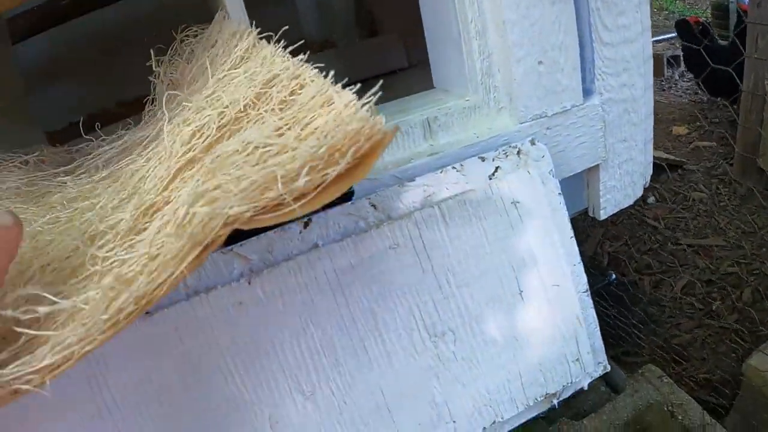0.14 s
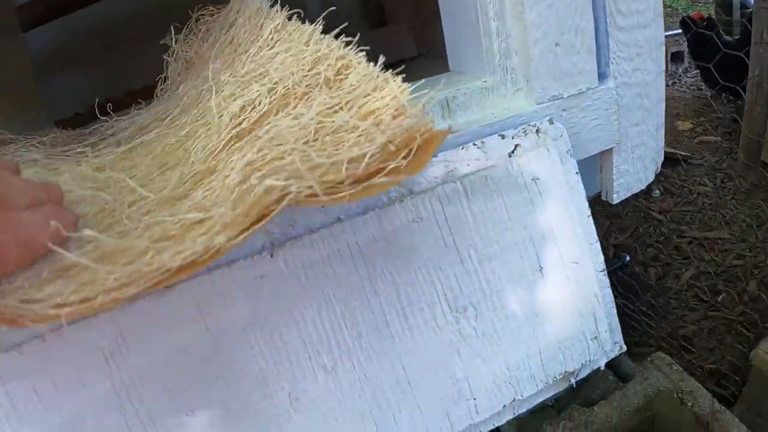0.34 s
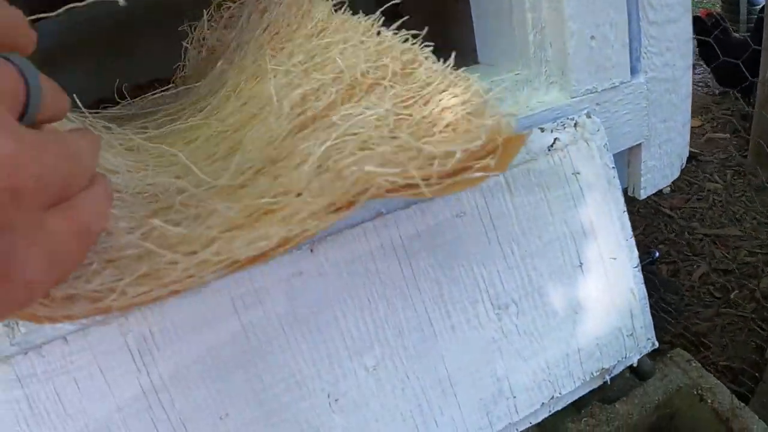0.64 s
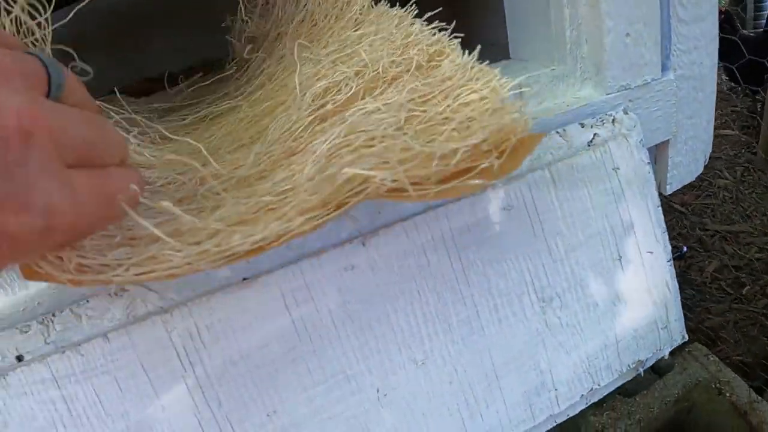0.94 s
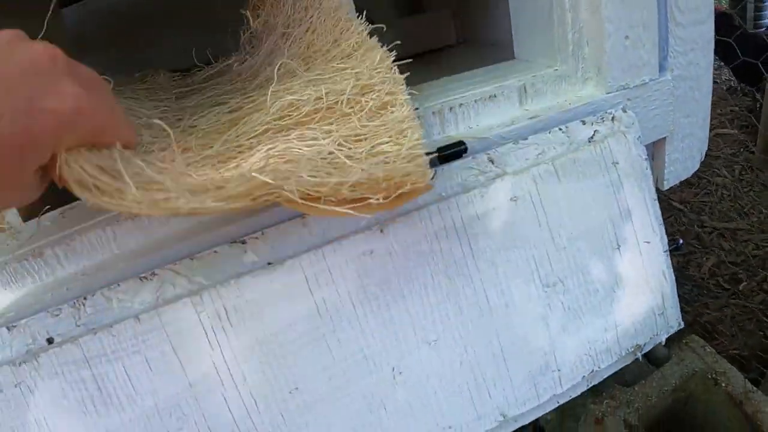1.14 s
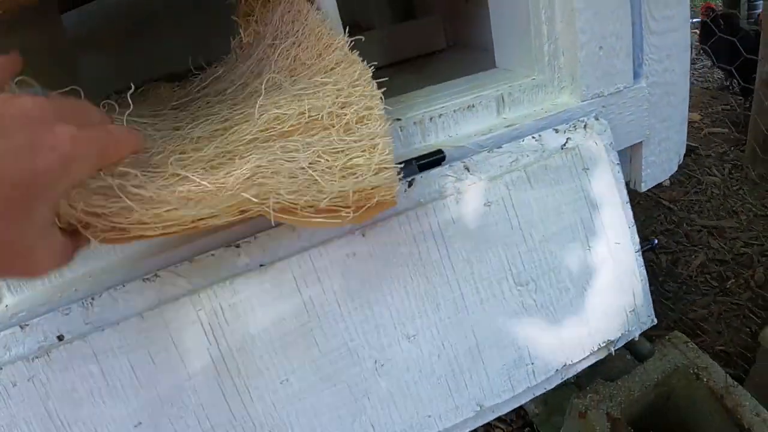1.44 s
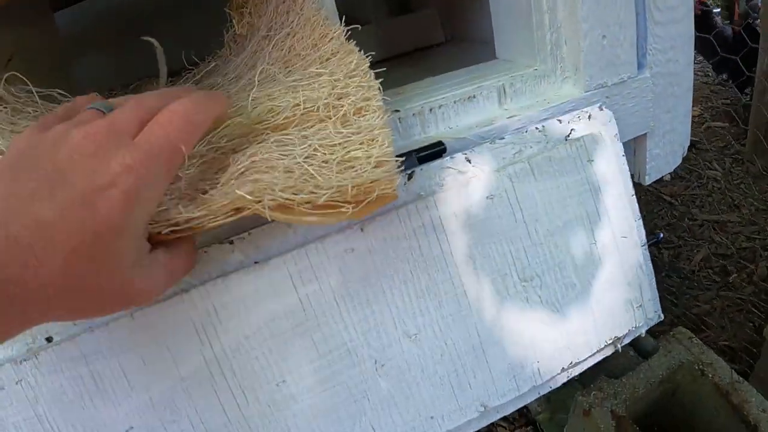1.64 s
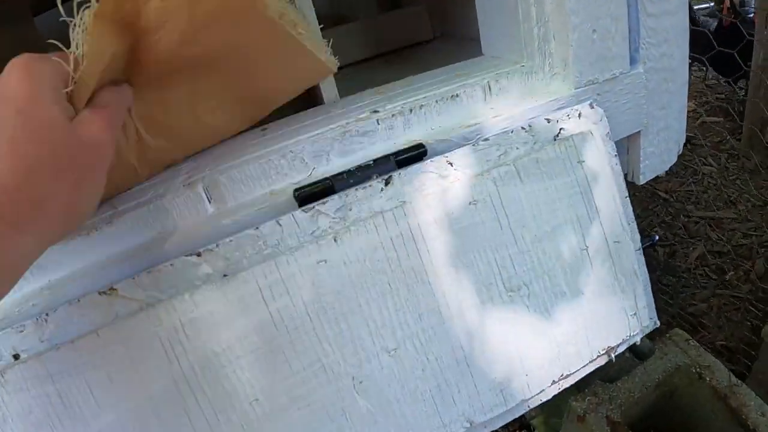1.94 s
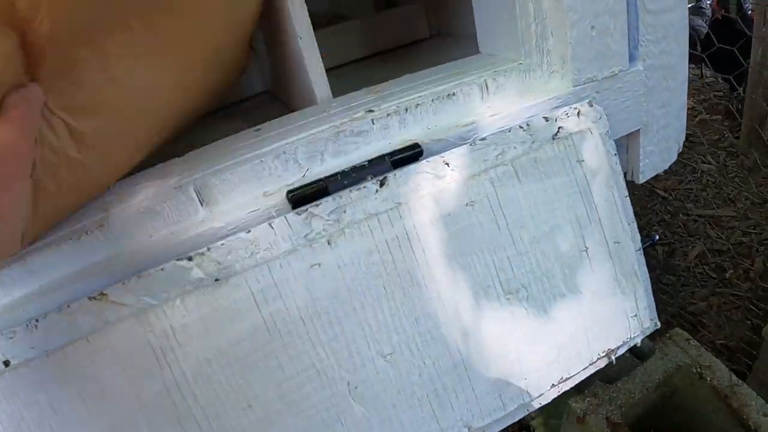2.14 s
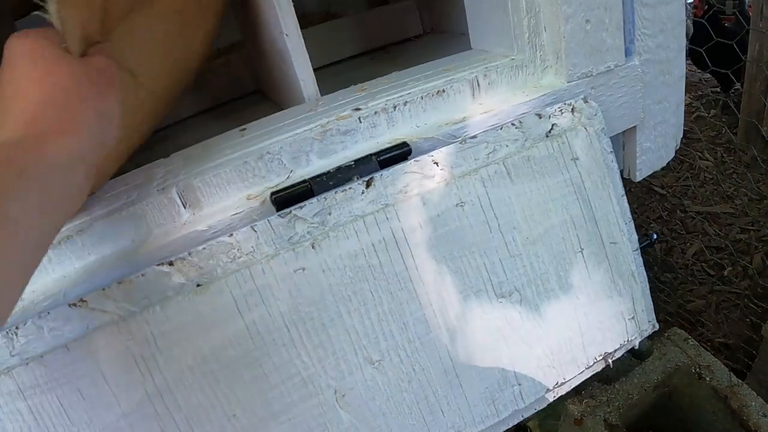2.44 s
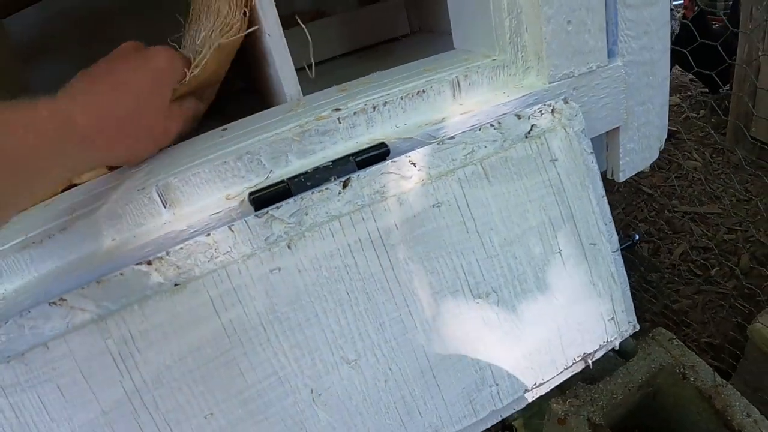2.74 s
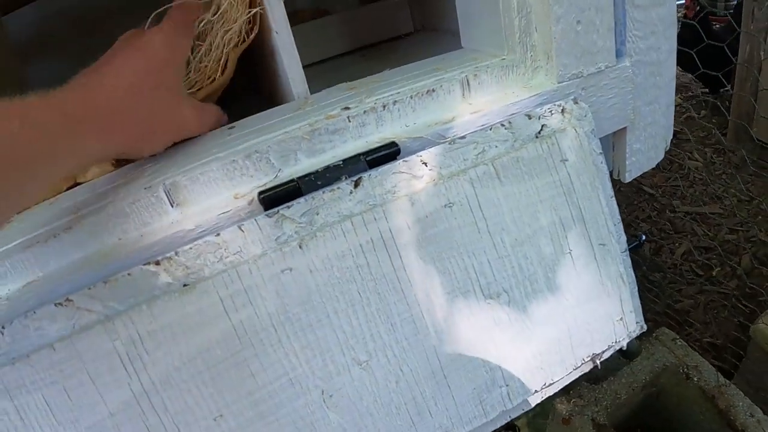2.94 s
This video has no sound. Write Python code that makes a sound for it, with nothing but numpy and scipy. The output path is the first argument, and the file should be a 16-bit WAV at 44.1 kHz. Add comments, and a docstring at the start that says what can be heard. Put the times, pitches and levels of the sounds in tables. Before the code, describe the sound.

Dry fibrous pad crackles and rustles as a hand squeezes it into a wooden box

```python
"""Outdoors, close to a wooden box: a hand pushes and squeezes a dry paper-backed wood-fibre pad into it.
Fibres slip in dense clumps of ringing ticks over hiss; strands snap as clicks, bundles as gritty bursts.
The backing rumbles as filtered random rubs and buckles in low rings; a slide rasps as narrow-band noise.
Far off, a bird chirps in gliding whistles over the noise of the outdoor air.
A small mono camera microphone hears it, with a steep bass cut and a boomy low middle."""
import sys
import numpy as np
from scipy import signal
from scipy.fft import rfft, irfft, next_fast_len
from scipy.io import wavfile

SR = 44100
rng = np.random.default_rng(int(sys.argv[2]) if len(sys.argv) > 2 else 0)


def invert_db(x):
    """Field ratio 10**(x/20) for x, a level in decibels (scalar or array-like)."""
    u = np.asarray(x, float) / 20
    return 10 ** u


def int16_out(signal):
    """Quantize to a 16-bit WAV file."""
    q = np.round(np.clip(np.atleast_2d(signal).T, -1, 1) * 32767)
    wavfile.write(sys.argv[1], SR, q.astype(np.int16))


N = 136710

# squeezing hand, in curves for successive stretches of the squeeze; the last two run on as one grab: [t/s,
# fibre rustle level/dB, thin-fibre treble re rustle level/dB]
SQUEEZE_CURVES = [
    [(0.218, -68, -37), (0.226, -43, -5.5), (0.282, -32, -11.5), (0.322, -32, -8.5), (0.329, -39, -9),
     (0.345, -28.5, -9), (0.362, -40, -9), (0.383, -27.5, -8), (0.394, -32, -6), (0.44, -36.5, -10.5),
     (0.452, -26, -9), (0.498, -38, -9.5), (0.512, -33, -4.5), (0.536, -29, -14.5), (0.564, -29, -14.5),
     (0.64, -39, -9), (0.708, -34, -11.5)],
    [(0.715, -29, -10), (0.753, -26, -11.5), (0.801, -31.5, -13.5), (0.809, -27.5, -12), (0.823, -30.5, -8),
     (0.951, -30.5, -11), (0.991, -27, -4.5), (1.047, -36, -14.5), (1.095, -25, -9.5), (1.211, -30.5, -10),
     (1.371, -32, -10.5), (1.425, -33, -10), (1.435, -32, -4), (1.455, -43, -8.5), (1.523, -29, -10),
     (1.595, -38.5, -8), (1.63, -48, -26)],
    [(1.64, -58, -32), (1.688, -53, -31), (1.694, -49, -14), (1.704, -40.5, -5), (1.72, -47.5, -18),
     (1.778, -37, -3), (1.798, -36, -6.5), (1.908, -27, -10.5), (1.916, -33.5, -6), (1.956, -29.5, -13),
     (1.966, -28.5, -3), (1.978, -30.5, -9), (2.082, -31.5, -9), (2.086, -31.5, -2), (2.152, -31.5, -10),
     (2.216, -30.5, -7), (2.24, -34, -7.5)],
    [(2.25, -36.5, -7), (2.28, -34.5, -7), (2.29, -39, -3), (2.304, -36, -10), (2.316, -35, -6),
     (2.328, -34, -12.5), (2.366, -31.5, -1.5), (2.446, -28, -9), (2.572, -28, -4), (2.626, -27, -5.5),
     (2.784, -28.5, -6), (2.804, -37.5, -7.5), (2.858, -34, -5), (2.942, -40.5, -8.5), (3.024, -61, -13),
     (3.036, -52.5, 7), (3.1, -54, -25)],
]
# backing rubbing and buckling against the box: [t/s, boom level/dB, deep part re boom level/dB]
BACKING_RUB = [(0.21, -91, -18), (0.23, -60, 1), (0.28, -40, -6), (0.35, -40.5, -1), (0.38, -28, -20),
               (0.39, -52, -11), (0.42, -43, -7), (0.49, -26, -32), (0.5, -40.5, -3), (0.53, -36, -1),
               (0.54, -28, -29), (0.62, -33, -3.5), (0.63, -44, 1), (0.67, -39, -22), (0.71, -39.5, -1),
               (0.73, -32.5, 8), (0.8, -34.5, -8), (0.85, -25.5, -24), (0.88, -27, -28), (0.9, -37.5, -12),
               (0.95, -25, -13), (0.98, -25.5, -16), (1.0, -23, -10.5), (1.06, -39.5, -20),
               (1.08, -27.5, -16), (1.16, -22, -19), (1.21, -32, -8.5), (1.26, -28, -23),
               (1.35, -27.5, -10), (1.44, -30.5, -43), (1.46, -44, -13), (1.52, -37, -16),
               (1.58, -36.5, -8), (1.63, -57, 0), (1.67, -51, -35), (1.69, -46, -7), (1.73, -49, -10),
               (1.84, -35.5, -7.5), (1.91, -22.5, -27.5), (1.93, -37, -2), (2.02, -22, -29),
               (2.05, -35.5, -24), (2.17, -33, -4.5), (2.23, -29, -19), (2.25, -51, 7.5), (2.35, -49.5, 6),
               (2.38, -26.5, -17), (2.42, -36, 6), (2.47, -27, -13.5), (2.54, -31, -0.5), (2.58, -28, -7),
               (2.69, -29, -12), (2.71, -28, -15), (2.74, -29, -17), (2.79, -26.5, 2.5), (2.81, -32, -11),
               (2.83, -26, -9), (2.9, -33.5, -22), (2.99, -57.5, -2), (3.1, -71, -32)]
# single strands snap: [t/s, peak level/dB after the overall colour, before brightening, pitch f/Hz]
STRAND_SNAPS = [(0.0305, -46, 5500.0), (0.2769, -21, 2490.0), (0.2839, -18, 2210.0), (0.3195, -22, 6500.0),
                (0.3324, -6.5, 3400.0), (0.3573, -25, 3060.0), (0.3856, -7, 5000.0), (0.3953, -18, 3380.0),
                (0.4104, -16, 3630.0), (0.4461, -15, 3040.0), (0.4535, -14, 4600.0), (0.4615, -14, 3630.0),
                (0.4795, -17, 4800.0), (0.5034, -21, 2780.0), (0.5135, -21, 6000.0), (0.5446, -10, 5000.0),
                (0.5553, -14, 2120.0), (0.6036, -11, 2210.0), (0.6535, -24, 2870.0), (0.7011, -27, 2550.0),
                (0.7295, -11, 2380.0), (0.7573, -13, 3080.0), (0.8089, -14, 4900.0), (0.8248, -16, 2140.0),
                (0.8637, -11, 3380.0), (0.881, -18, 2590.0), (0.9029, -18, 2270.0), (0.9098, -15, 5400.0),
                (0.9296, -17, 2410.0), (1.0081, -17, 2620.0), (1.084, -14, 3330.0), (1.112, -9, 3200.0),
                (1.2143, -18, 2450.0), (1.2649, -13, 2540.0), (1.2766, -18, 2220.0), (1.3024, -20, 2430.0),
                (1.3229, -19, 2590.0), (1.3343, -15, 4800.0), (1.4334, -16, 3590.0), (1.4603, -26, 3150.0),
                (1.499, -15, 2500.0), (1.5261, -17, 3380.0), (1.5652, -23, 2140.0), (1.6106, -31, 2910.0),
                (1.6957, -14, 2850.0), (1.7045, -22, 5000.0), (1.7693, -19, 3190.0), (1.8097, -18, 2840.0),
                (1.8168, -20, 3420.0), (1.8307, -16, 5200.0), (1.8425, -11, 1990.0), (1.8525, -20, 3950.0),
                (1.8645, -11, 2380.0), (1.8809, -8, 4600.0), (1.895, -16, 4200.0), (1.9035, -10, 4500.0),
                (1.9111, -16, 2300.0), (1.9229, -22, 2960.0), (1.9351, -19, 2720.0), (1.9485, -14, 2420.0),
                (1.9567, -15, 2540.0), (1.9657, -11, 2710.0), (1.9712, -12, 3800.0), (1.9898, -19, 5500.0),
                (1.9976, -13, 2110.0), (2.0277, -10, 2940.0), (2.0486, -12, 3230.0), (2.058, -21, 6000.0),
                (2.0702, -17, 4800.0), (2.1086, -15, 3140.0), (2.2137, -15, 2290.0), (2.2565, -22, 2740.0),
                (2.2888, -7, 3500.0), (2.292, -24, 7000.0), (2.311, -22, 2700.0), (2.3172, -16, 3710.0),
                (2.3384, -18, 3710.0), (2.4353, -10, 3860.0), (2.6195, -11, 2770.0), (2.6463, -13, 2950.0),
                (2.6808, -13, 3020.0), (2.7593, -10, 3190.0), (2.787, -13, 3720.0), (2.8123, -21, 3610.0),
                (2.819, -21, 1990.0), (2.833, -23, 2020.0), (2.8488, -15, 3410.0), (2.8642, -18, 3830.0),
                (2.8954, -15, 4400.0), (2.9347, -19, 4800.0), (3.0354, -29, 3610.0)]
# a breaking strand is brighter than the rustle: [f/Hz, level/dB]
STRAND_BRIGHTNESS = [(1000, -3.5), (4000, -3), (6500, 8), (12000, -2.5)]
# bundles of fibres give way: [t/s, peak level/dB after the overall colour, pitch f/Hz, decay to 1/e t/s]
BUNDLE_CRUNCHES = [(0.2338, -30, 2330, 0.018), (0.277, -23, 2530, 0.016), (0.331, -22.5, 3130, 0.0088),
                   (0.367, -11.5, 2600, 0.0045), (0.457, -21, 3430, 0.0051), (0.5033, -23, 3660, 0.0073),
                   (0.5418, -21, 1760, 0.0076), (0.596, -22, 1680, 0.019), (0.653, -26.5, 2690, 0.0085),
                   (0.7233, -18, 2380, 0.023), (0.849, -19, 2580, 0.013), (0.94, -32, 2030, 0.004),
                   (1.0634, -30, 2470, 0.0039), (1.08, -27, 2670, 0.0055), (1.2602, -18.5, 1820, 0.0045),
                   (1.3294, -22, 1790, 0.0044), (1.432, -16.5, 4740, 0.0053), (1.4979, -23.5, 2040, 0.0078),
                   (1.6945, -18, 2100, 0.006), (1.695, -19, 2850, 0.007), (1.773, -21, 2530, 0.018),
                   (1.806, -22, 1820, 0.0034), (1.8795, -15.5, 3470, 0.0051), (1.9025, -15, 4570, 0.0018),
                   (1.943, -27, 2340, 0.007), (1.9956, -21, 1700, 0.0052), (2.019, -16, 3620, 0.0032),
                   (2.0454, -14.5, 3300, 0.0032), (2.086, -16, 2570, 0.0079), (2.2905, -21, 2500, 0.004),
                   (2.311, -18, 3000, 0.002), (2.406, -16, 2360, 0.024), (2.6453, -12, 2960, 0.0055),
                   (2.8166, -28, 1790, 0.0048), (2.855, -27, 3220, 0.0052), (2.8942, -19, 2760, 0.0031),
                   (2.9373, -21.5, 2630, 0.0028), (3.035, -34.5, 3200, 0.0094)]
# the backing buckles with a soft thump: [t/s, envelope peak level/dB before the band limits, pitch f/Hz]
BACKING_BUCKLES = [(0.024, -44.5, 730), (0.088, -43.5, 690), (0.232, -26, 768), (0.261, -22.5, 827),
                   (0.274, -14.5, 823), (0.298, -16.5, 788), (0.311, -19, 800), (0.37, -16, 790),
                   (0.407, -27.5, 692), (0.445, -22, 770), (0.48, -21, 766), (0.544, -22, 708),
                   (0.601, -22.5, 784), (0.713, -19.5, 523), (0.823, -16.5, 615), (0.844, -14.5, 850),
                   (0.91, -26, 530), (0.936, -17.5, 756), (1.001, -23, 670), (1.082, -21, 776),
                   (1.156, -22, 710), (1.22, -22, 614), (1.258, -24, 666), (1.293, -31, 674),
                   (1.351, -18.5, 650), (1.424, -18.5, 720), (1.514, -25, 565), (1.554, -29, 670),
                   (1.693, -33, 735), (1.776, -26.5, 625), (1.809, -23, 615), (1.842, -15.5, 630),
                   (1.864, -18.5, 625), (1.884, -17, 826), (1.903, -21, 716), (1.94, -15, 840),
                   (1.969, -13, 690), (1.996, -36, 710), (2.069, -28.5, 623), (2.089, -20, 792),
                   (2.157, -19, 704), (2.212, -17, 762), (2.255, -28, 805), (2.287, -26.5, 660),
                   (2.31, -24.5, 680), (2.355, -30, 650), (2.385, -25, 753), (2.412, -19, 754),
                   (2.443, -18.5, 700), (2.471, -18, 604), (2.563, -18, 602), (2.634, -23, 607),
                   (2.667, -25.5, 634), (2.701, -18, 600), (2.749, -21, 660), (2.78, -13.5, 643)]
# the pad slides along the box wall with a rising rasp: [t/s, rms level/dB, pitch f/Hz]
WALL_SLIDE = [(2.44, -55, 2050), (2.5, -40, 2200), (2.56, -35, 2550), (2.63, -31, 2875), (2.68, -40, 2950),
              (2.75, -60, 2950)]
# far bird chirps: [t/s, length t/s, start f/Hz, end f/Hz, level/dB before roughening]
BIRD_CHIRPS = [(0.02, 0.022, 2250, 2600, -45), (0.112, 0.035, 2800, 2950, -52),
               (0.148, 0.028, 2350, 3150, -46), (0.187, 0.04, 2850, 2850, -54)]
# spectrum of the outdoor background: [f/Hz, relative level/dB]
AIR_SPECTRUM = [(150, -14), (250, -58), (312, -2), (596, 6.5), (796, 2), (977, -9), (1550, -7),
                (3220, -3.5), (3510, -8), (5800, -16.5), (7300, -12.5), (7940, -17), (8950, -40),
                (10800, -25), (14700, -60)]
# overall colour of the pad's sound and the microphone together: [f/Hz, level/dB]
OVERALL_COLOUR = [(30, -33), (200, -21), (290, -52), (315, -15.5), (335, 3.5), (446, -4.5), (503, -4),
                  (606, 6), (700, 5.5), (860, 2), (930, -13.5), (1310, -20.5), (1520, -17.5), (2100, -15.5),
                  (2860, -12.5), (4380, -9.5), (5700, -15.5), (7170, -22.5), (8220, -32), (8800, -39),
                  (9020, -55), (9300, -36), (9750, -32.5), (11000, -27.5), (12100, -43), (12700, -41.5),
                  (13300, -45), (14200, -58), (14700, -83)]
# left-right difference, added left and taken from the right, before its flicker: [f/Hz, level/dB re the sound]
SIDE_SPECTRUM = [(100, -10), (250, -34), (600, -50), (1200, -38.5), (4000, -37), (8000, -23.5),
                 (10500, -17), (13000, 0)]

DEEP_SPLIT_HZ, LOW_SPLIT_HZ, HIGH_SPLIT_HZ = 490, 900, 5000


def squeeze():
    """Rubbing fibres tick and ring briefly at many pitches over a slip hiss; the backing rumbles."""
    clumps = drift(50)
    level_db, treble_db = in_time(np.vstack(SQUEEZE_CURVES))
    boom_db, deep_db = in_time(BACKING_RUB)
    rustle = fibre_rustle(level_db, treble_db, clumps)
    return invert_db(level_db) * rustle + invert_db(boom_db) * backing_rumble(deep_db, clumps)


def fibre_rustle(level_db, treble_db, clumps):
    """Slipping fibres ring at ten pitches, each swelling in patches, with hiss and bare sharp pricks."""
    # harder squeezing brings more ticks: 0.8 dB of rate per dB of level, 3500 a second at -34 dB
    rate = 3500 * invert_db(0.8 * (level_db + 34))
    clump_db = 0.6 * clumps
    ticks = grains(rate, 2.2, clump_db)
    dealt = rng.integers(0, 10, N)  # which pitch each tick rings
    fibres = np.zeros(N)
    for k, hz in enumerate(np.geomspace(1300, 9000, 10)):
        patches = invert_db(4.0 * drift(22))
        fibres += ring(ticks * (dealt == k) * patches, hz, 8 / hz)  # 60 dB down in 8 cycles
    hiss_share = 0.35  # of the power of ticks and hiss together
    fibres = np.sqrt(1 - hiss_share) * rms_one(fibres) + np.sqrt(hiss_share) * rng.standard_normal(N)
    # bare ticks of the thinnest fibres
    pricks = grains(300, 1.5, clump_db)
    fibres = fibres + invert_db(-9) * rms_one(pricks)
    middle = cut(cut(fibres, LOW_SPLIT_HZ, "high"), HIGH_SPLIT_HZ, "low", order=2)
    treble = cut(fibres, HIGH_SPLIT_HZ, "high", order=2)
    middle = middle / band_level(middle, 1000, 5000)
    treble = treble / band_level(treble, 5000, 8500)
    return middle + invert_db(treble_db) * treble


def backing_rumble(deep_db, clumps):
    """Dense random rubs of the paper backing, split into a boom and a deep part."""
    rubs = grains(2700, 1, 0.57 * clumps + 0.8 * drift(19))
    boom = cut(cut(rubs, LOW_SPLIT_HZ, "low"), DEEP_SPLIT_HZ, "high")
    deep = cut(rubs, DEEP_SPLIT_HZ, "low")
    return boom / band_level(boom, 500, 900) + invert_db(deep_db) * deep / band_level(deep, 300, 480)


def snaps():
    """A breaking strand gives one sharp click at its pitch and a faint fizz as it settles."""
    t = np.arange(1024) / SR
    fizz = rng.standard_normal((len(STRAND_SNAPS), 1024)) * np.exp(-t / 0.004)
    drives = invert_db(-29) * fizz
    drives[:, 0] = rng.choice([-1, 1], len(STRAND_SNAPS))
    return colour(place(STRAND_SNAPS, drives, cycles=2.5, edge=0.9), STRAND_BRIGHTNESS)


def crunches():
    """A bundle giving way is a gritty noise burst that starts at once, dies away and rings."""
    t = np.arange(2048) / SR
    decay_s = np.maximum(np.array(BUNDLE_CRUNCHES)[:, 3:], .0005)
    shape = (len(BUNDLE_CRUNCHES), 2048)
    grit = invert_db(3.5 * rng.exponential(1, shape))
    drives = grit * rng.standard_normal(shape) * np.exp(-t / decay_s)
    return place(BUNDLE_CRUNCHES, drives, cycles=8, edge=0.086)


def buckles():
    """Bending backing gives a soft-edged low ring of a few cycles, in the boomy low middle."""
    out, t = np.zeros(N + 2048), np.arange(2048) / SR
    rise_s, decay_cycles = 0.0004, 5.14
    for s, db, hz in BACKING_BUCKLES:
        shape = (1 - np.exp(-t / rise_s)) ** 2 * np.exp(-t * hz / decay_cycles)
        thump = shape / shape.max() * np.sin(2 * np.pi * hz * t)
        start = int(s * SR)
        out[start:start + 2048] += invert_db(db) * thump
    return cut(cut(out[:N], 310, "high"), 920, "low")


def slide():
    """Friction on the box wall: a narrow band of noise that follows the slide's pitch."""
    level_db, hz = in_time(WALL_SLIDE)
    turn = 2 * np.pi * np.cumsum(hz) / SR
    playing = np.arange(N) / SR < WALL_SLIDE[-1][0]
    width_hz = 330  # rate of the two drifts that widen the tone into a band
    rasp = drift(width_hz) * np.sin(turn) + drift(width_hz) * np.cos(turn)
    return playing * invert_db(level_db) * rasp


def bird():
    """Short gliding whistles, roughened by distance with a fast random drift."""
    out, t = np.zeros(N), np.arange(N) / SR
    for s, length, start_hz, end_hz, db in BIRD_CHIRPS:
        u = np.clip((t - s) / length, 0, 1)  # progress through the chirp
        hz = start_hz + (end_hz - start_hz) * u
        out += invert_db(db) * np.sin(np.pi * u) * np.sin(2 * np.pi * np.cumsum(hz) / SR)
    return out * drift(170)


def air():
    """Outdoor background: coloured noise whose level flickers slightly."""
    noise = cut(colour(rng.standard_normal(N), AIR_SPECTRUM), 288, "high")
    return invert_db(-51 + 1 * drift(24)) * rms_one(noise)


def grains(rate, spread_db, clump_db):
    """Random clicks of uneven size, denser and louder in clumps; rate is per second before clumping."""
    sizes = invert_db(spread_db * np.minimum(rng.exponential(1, N), 4)) * rng.choice([-1, 1], N)
    struck = rng.random(N) < rate * invert_db(clump_db) / SR
    return sizes * invert_db(clump_db) * struck


def ring(clicks, hz, t60):
    """Two-pole resonance: a unit click sets a sine of height 1 ringing, 60 dB down after t60 seconds."""
    r, w = invert_db(-60 / (t60 * SR)), 2 * np.pi * hz / SR
    return signal.lfilter([0, np.sin(w)], [1, -2 * r * np.cos(w), r * r], clicks + 1e-18)


def place(rows, drives, cycles, edge):
    """Rings each drive at its row's pitch, with some bare edge; sets its peak after the overall colour."""
    out = np.zeros(N + drives.shape[1])
    impulse = 1.0 * (np.arange(N) == 64)
    response = colour(cut(impulse, LOW_SPLIT_HZ, "high"), OVERALL_COLOUR)[:128]
    for (s, db, hz, *_), drive in zip(rows, drives):
        sound = ring(drive, hz, cycles / hz) + edge * drive
        # strands give little sound under 0.39 of their pitch
        sound = signal.lfilter(*signal.butter(2, 0.39 * hz, "high", fs=SR), sound)
        heard_peak = np.abs(np.convolve(sound, response)).max()
        start = int(s * SR)
        out[start:start + len(drive)] += invert_db(db) * sound / heard_peak
    return cut(out[:N], LOW_SPLIT_HZ, "high")


def in_time(rows):
    """Curve columns at every sample; -90 before the first row."""
    s, *columns = np.transpose(rows)
    return [np.interp(np.arange(N) / SR, s, c, left=-90) for c in columns]


def drift(rate):
    """Low-passed noise of rms 1 that wanders at about rate Hz."""
    r = np.exp(-2 * np.pi * rate / SR)
    return rms_one(signal.lfilter([1], [1, -2 * r, r * r], rng.standard_normal(N + SR))[SR:])


def rms_one(x):
    """Scale to rms 1."""
    return x / np.sqrt(np.mean(x ** 2) + 1e-20)


def cut(x, hz, kind, order=6):
    """Low- or high-pass, steep unless told otherwise."""
    return signal.sosfilt(signal.butter(order, hz, kind, fs=SR, output="sos"), x)


def colour(x, points):
    """Gain from a [f/Hz, level/dB] table, on a log-frequency axis."""
    size = next_fast_len(N + 4096)
    hz = np.arange(size // 2 + 1) * SR / size + 1
    f, db = np.transpose(points)
    gain = invert_db(np.interp(np.log(hz), np.log(f), db))
    return irfft(rfft(x, size) * gain, size)[..., :N]


def band_level(x, low_hz, high_hz):
    """Rms that a band of x has after the overall colour."""
    power = np.abs(rfft(colour(x, OVERALL_COLOUR))) ** 2
    hz = np.arange(N // 2 + 1) * SR / N
    return np.sqrt(2 * power[(hz > low_hz) & (hz < high_hz)].sum()) / N


def scene():
    """Close fibres and rumble take the overall colour; buckles, slide, air and far bird do not."""
    pad = colour(squeeze() + snaps() + crunches(), OVERALL_COLOUR)
    mono = pad + buckles() + slide() + air() + bird()
    return np.array([mono, mono])


def band_limit(x):
    """A steep low-pass at the top of the band."""
    return signal.sosfilt(signal.butter(12, 14820, fs=SR, output="sos"), x)


def record(dry):
    """Rounds off peaks, cuts bass and top; a faint left-right difference flickers, most in the top treble."""
    round_at = .7  # full scale is 1
    dry = round_at * np.tanh(dry / round_at)
    dry = colour(dry, [(200, -22), (300, 0), (13500, 0), (14800, -30)])
    side = colour(dry[0], SIDE_SPECTRUM) * drift(51)
    mix = dry + side * np.array([[1], [-1]])
    return band_limit(mix)


dry = scene()
out = record(dry)
int16_out(out)
```